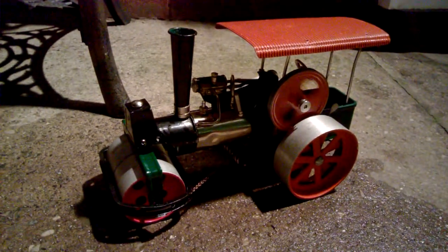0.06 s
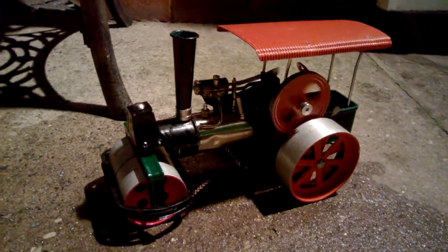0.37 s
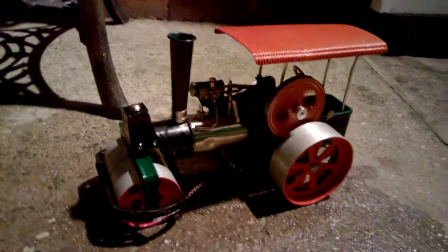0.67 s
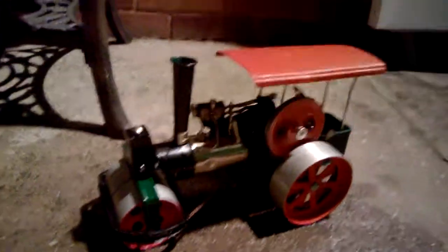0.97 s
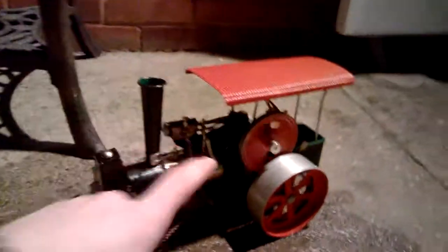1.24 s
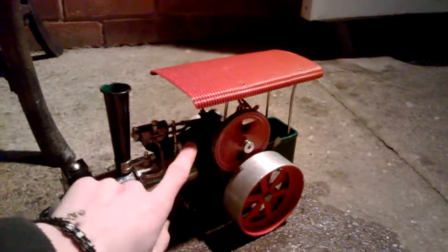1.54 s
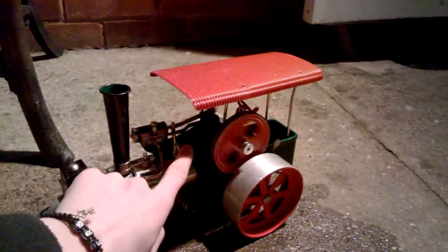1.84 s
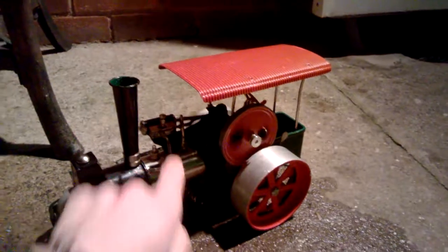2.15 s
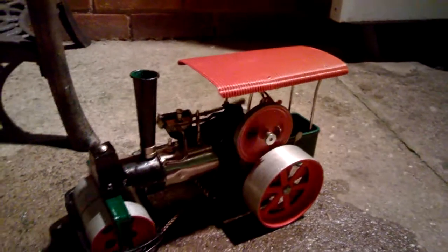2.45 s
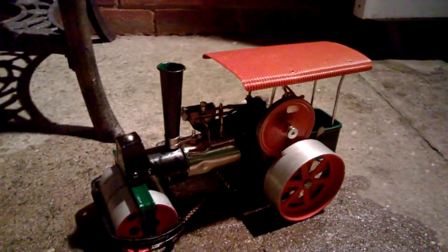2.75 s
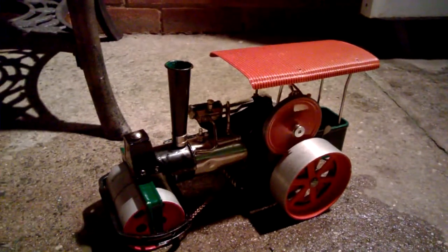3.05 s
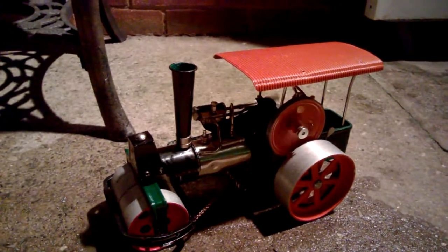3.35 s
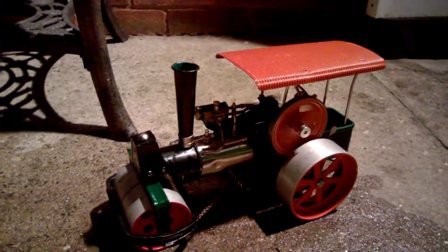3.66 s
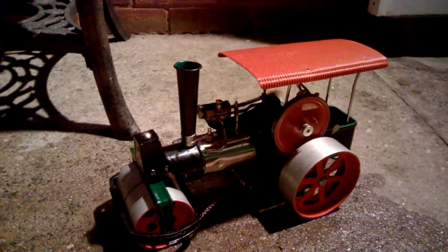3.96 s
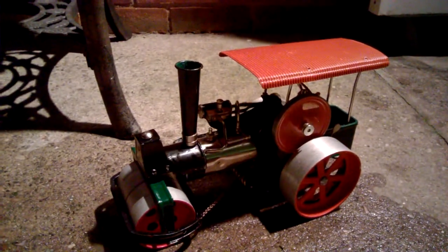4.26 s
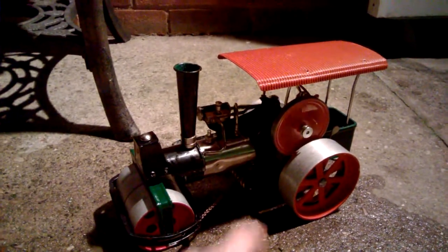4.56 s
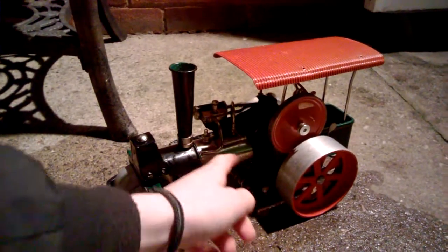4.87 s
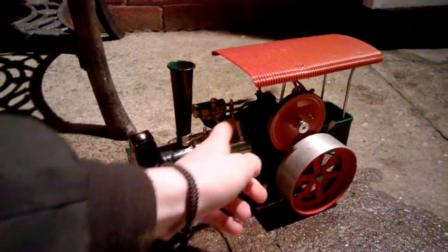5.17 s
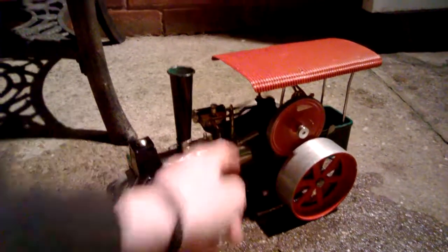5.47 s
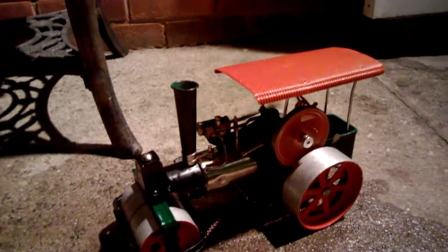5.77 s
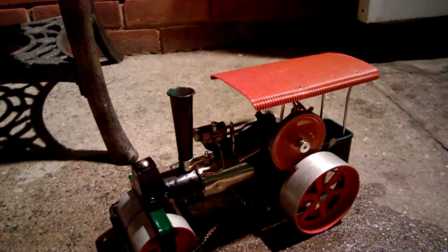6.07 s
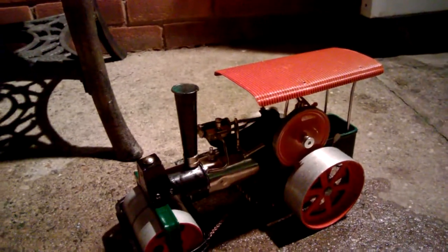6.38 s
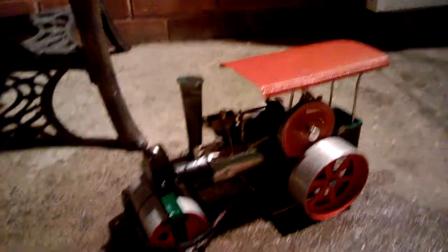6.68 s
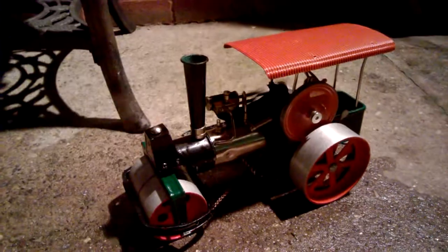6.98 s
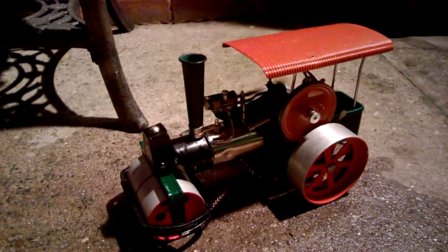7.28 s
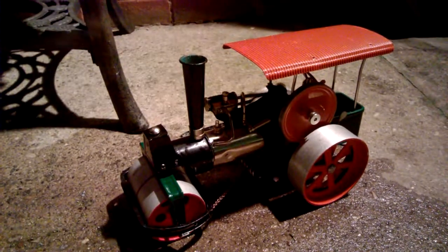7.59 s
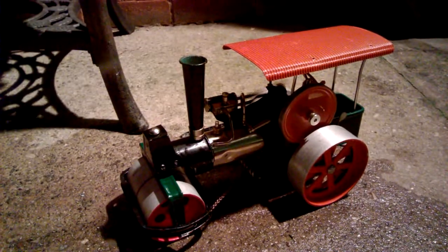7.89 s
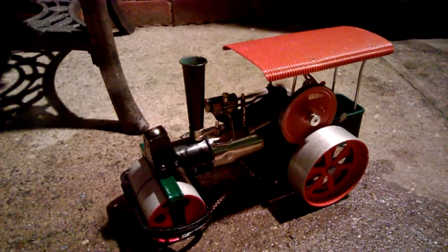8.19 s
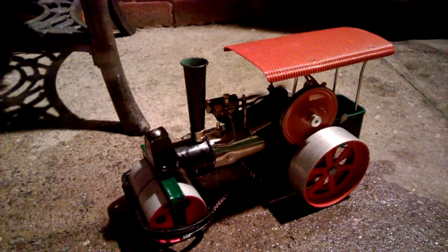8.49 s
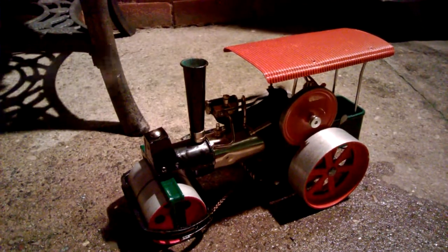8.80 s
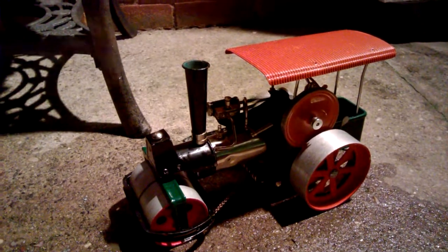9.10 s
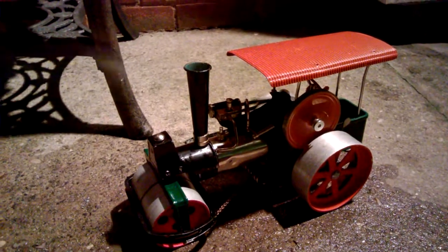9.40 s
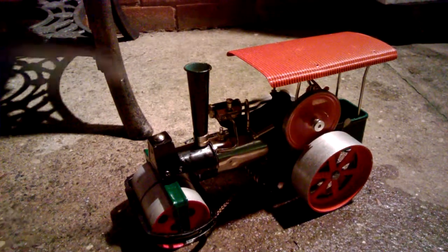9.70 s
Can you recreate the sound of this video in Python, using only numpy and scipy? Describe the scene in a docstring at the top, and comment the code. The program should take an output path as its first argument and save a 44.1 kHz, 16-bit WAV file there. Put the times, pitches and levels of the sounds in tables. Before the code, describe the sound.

A model steam roller runs close to the microphone on a patio, at first ticking faintly about five times a second over a soft burner rush. Wind rumbles and thumps on the microphone, hardest from 0.5 to 1.3 seconds, with weaker gusts until about 3.3. A sleeve swishes past around 1 second. Just after 2 seconds the engine knocks louder, steam hisses, and it begins to speed up steadily, with light linkage clinks from about 3 to 4. From 4 seconds a bright, ringing gear rattle grows, and a few sharper clicks come just after 5. From 6 seconds the rattle is loud, with sharp metal clanks quickening to nearly four a second and scattered rod ticks. Rapid puffing, a thin high ring and a faint rising hum continue to the end, near 10 seconds. A faint low drone wavers in the distance.

```python
"""A model steam roller runs out of gear on a patio at night. Its crank ticks slowly until a finger
opens the steam valve; then it speeds up, and two puffs a turn excite the resonances of the chimney.
Loose gears rattle and ring in their backlash, swelling and clanking once a turn of the big wheel.
Wind buffets the microphone, mostly at first, a sleeve brushes past, and a brick wall answers."""
import sys
import numpy as np
from scipy import signal
from scipy.fft import rfft, irfft, next_fast_len
from scipy.io import wavfile
from scipy.ndimage import map_coordinates

SR = 44100
rng = np.random.default_rng(int(sys.argv[2]) if len(sys.argv) > 2 else 0)


def store_wav(level_fs):
    """Save 16-bit WAV to argv[1]."""
    pcm = np.round(np.clip(np.atleast_2d(level_fs), -1, 1) * 32767)
    wavfile.write(sys.argv[1], SR, pcm.T.astype(np.int16))


N = 438354
TIME = np.arange(N) / SR
FFT_SIZE = 2 * next_fast_len(N // 2 + 8192)

def amp(db):
    """Amplitude grows tenfold for every 20 dB."""
    return 10 ** (np.asarray(db) / 20)

def along(points, hz):
    """Interpolation of (Hz, value) points on a logarithmic frequency axis."""
    freqs, values = np.transpose(points)
    return np.interp(np.log(hz + 1), np.log(freqs + 1), values)

def curves(rows):
    """Linear interpolation in time: one curve for each column after the first."""
    times, *columns = np.transpose(rows)
    return [np.interp(TIME, times, column) for column in columns]

def wobble(knots_per_s):
    """Slow random modulation: a spline through Gaussian knots."""
    return map_coordinates(rng.standard_normal(4096), [np.arange(N) * knots_per_s / SR], mode="wrap")

def white():
    """White noise has equal mean power at all frequencies."""
    return rng.standard_normal(N)

def filtered(x, response):
    """Linear filtering: the spectrum is multiplied by a response scaled to unit power."""
    gain = response(np.fft.rfftfreq(FFT_SIZE, 1 / SR))
    return irfft(rfft(x, FFT_SIZE) * gain / np.sqrt(np.mean(np.abs(gain) ** 2)), FFT_SIZE)[:N]

def coloured(x, spectrum):
    """Minimum-phase filtering imposes a shape of (Hz, dB) points causally."""
    def response(hz):
        cepstrum = irfft(np.log(amp(along(spectrum, hz))))
        cepstrum[1:len(hz) - 1] *= 2
        cepstrum[len(hz):] = 0
        return np.exp(rfft(cepstrum))
    return filtered(x, response)

def rung(x, modes):
    """Modal superposition: x drives damped resonators of alternating polarity."""
    def response(hz):
        return sum((-1) ** k * amp(db) * 1j * hz * width / (centre ** 2 - hz ** 2 + 1j * hz * width)
                   for k, (centre, width, db) in enumerate(modes))
    return filtered(x, response)

def spikes(times, sizes):
    """Ideal impacts: one impulse at each time."""
    return np.bincount(np.maximum(np.round(times * SR), 0).astype(int), sizes, N)[:N]

def bursts(hits, rise, decay):
    """Convolution gives each impulse an envelope of noise; the time constants are in seconds."""
    t = np.arange(SR // 8) / SR
    envelope = (1 - np.exp(-t / rise)) * np.exp(-t / decay)
    return signal.fftconvolve(hits, envelope / envelope.max())[:N] * white()

def strokes(angle, offset, scatter_db, slack=0):
    """Cyclic excitation: one impulse a turn. Angle, offset and random slack are in crank turns."""
    size_spread, time_spread = rng.standard_normal((2, 256))
    turns = np.arange(256) - 1 + offset + slack * time_spread
    times = np.interp(turns, angle, TIME, left=N, right=N)
    heard = times < N
    return spikes(times[heard], amp(scatter_db * size_spread[heard]))

def chatter(angle, count, scatter_db):
    """Clearance lets loose parts make several uneven contacts a turn."""
    return sum(strokes(angle, k / count, scatter_db, slack=0.0898) for k in range(count))

def levelled(x, seconds):
    """Division by a running RMS partly evens out the level."""
    window = signal.windows.hann(int(seconds * SR))
    power = np.abs(signal.fftconvolve(x ** 2, window, "same")) / (seconds * SR / 2)
    return x / np.sqrt(power + 0.36 * np.mean(x ** 2))

# Course of the drone. Each row: time in seconds, level in dB.
DRONE_LEVEL = [(0, -45.5), (3.4, -52.5), (4.6, -54.5), (5.4, -52), (6.5, -57.5), (6.77, -44.5), (7.75, -50),
               (8.0, -45), (8.25, -48), (8.6, -40), (9.25, -45.5), (9.94, -46.5)]
# Its spectrum. Each row: frequency in Hz, gain in dB.
DRONE_SPECTRUM = [(40, -2.5), (110, -8.5), (180, 4.5), (220, -1), (270, -14.5), (600, -17.5), (2000, -33.5),
                  (8000, -56), (12000, -51)]

def drone():
    """Amplitude-modulated low noise is heard as a far, wavering drone."""
    return amp(curves(DRONE_LEVEL)[0] + 2.5 + 2 * wobble(7.1)) * coloured(white(), DRONE_SPECTRUM)

# Passage of the sleeve. Each row: time in seconds, level in dB.
SLEEVE_LEVEL = [(.5, -83), (.63, -50), (.76, -66), (.86, -56.5), (1.06, -46), (1.25, -55), (1.7, -69),
                (2, -91)]
# Spectrum of rubbing cloth. Each row: frequency in Hz, gain in dB.
CLOTH_SPECTRUM = [(400, -59), (1500, -1.5), (4000, 3), (6000, -5.5), (9500, -12.5), (11000, -30),
                  (15000, -32)]

def sleeve():
    """Sliding friction of cloth makes a rough, broadband swish."""
    return amp(curves(SLEEVE_LEVEL)[0] + 2.8 * wobble(60.55)) * coloured(white(), CLOTH_SPECTRUM)

# Gusts of wind. Each row: start in seconds, hold in seconds, strength in dB.
WIND_GUSTS = [(0.016, 0.11, -21), (0.241, 0.038, -26), (0.413, 0.071, -23), (0.516, 0.0069, -14),
              (0.558, 0.045, -17), (0.622, 0.073, -12.5), (0.74, 0.073, -18.5), (0.87, 0.012, -14),
              (0.944, 0.043, -18), (1.009, 0.07, -14.5), (1.113, 0.085, -15.5), (1.253, 0.047, -13.5),
              (1.511, 0.042, -23), (1.811, 0.024, -22), (1.928, 0.043, -22.5), (2.04, 0.028, -22.5),
              (2.155, 0.29, -39.5), (2.989, 0.033, -26), (3.114, 0.02, -31.5), (3.228, 0.059, -28),
              (4.63, 0.27, -42.5), (6.256, 0.029, -34.5), (9.56, 0.27, -40)]

def gustiness():
    """Gusts rise and decay exponentially over a light breeze; the result is in dB re a full gust."""
    attack_s, release_s, full_gust_db = 0.02, 0.035, -15
    strength = amp(-51 - wobble(7))  # the breeze
    for start, hold, db in WIND_GUSTS:
        before = np.maximum(start - TIME, 0) / attack_s
        after = np.maximum(TIME - start - hold, 0) / release_s
        strength = np.maximum(strength, amp(db) * np.exp(-before - after))
    eddies_db = 1.3 * wobble(30)
    return 20 * np.log10(strength) - full_gust_db + eddies_db

# Two spectra of wind noise. Each row: frequency in Hz, gain in dB.
RUMBLE_SPECTRUM = [(15, -4.5), (30, 0), (75, 0.5), (150, -2.5), (240, -12.5), (400, -38), (1000, -76),
                   (3000, -84)]
FLUTTER_SPECTRUM = [(60, -22), (150, 0), (280, 5), (480, -5.5), (700, -18), (950, -23.5), (1400, -37),
                    (4000, -53), (15000, -81)]

def wind():
    """Turbulent pressure on the microphone: light air murmurs, stronger gusts rumble, then flutter."""
    gust_db = gustiness()
    rumble = levelled(coloured(white(), RUMBLE_SPECTRUM), seconds=0.11)
    flutter = levelled(coloured(white(), FLUTTER_SPECTRUM) * amp(4.5 * wobble(70)), seconds=0.1)
    murmur = coloured(white(), [(15, -32.5), (30, 3.5), (70, 2.5), (110, -22), (250, -23),
                                (1000, -51.5), (15000, -110)])
    return (amp(-27 + 0.63 * gust_db) * murmur + amp(-17 + 1.28 * gust_db) * rumble
            + amp(-21.5 + 2.35 * gust_db) * flutter)

# The hardest eddies. Each row: start in seconds, level in dB.
EDDY_HITS = [(0.512, -17), (0.604, -12), (0.646, -12), (0.699, -15), (0.723, -9.5), (0.881, -11),
             (0.958, -24), (1.058, -9), (1.125, -9.5), (1.282, -17.5)]
# Their spectrum. Each row: frequency in Hz, gain in dB.
THUMP_SPECTRUM = [(80, -5), (300, -3), (520, -7), (900, -22.5), (1500, -36.5), (5000, -66), (15000, -85)]

def buffets():
    """The pressure pulse of a single eddy thumps the microphone."""
    times, db = np.transpose(EDDY_HITS)
    return amp(-2.5) * coloured(bursts(spikes(times, amp(db)), rise=0.0014, decay=0.0047), THUMP_SPECTRUM)

# Reverberation of the patio. Each row: frequency in Hz, time to decay by 60 dB in seconds.
PATIO_DECAY = [(200, 0.2), (2000, 0.087), (10000, 0.15)]

def patio(x):
    """Reflections from paving and wall form a short, exponentially decaying tail after 4 ms."""
    hz, t, noise = signal.stft(rng.standard_normal(SR // 3), SR, nperseg=256)
    decay = amp(-60 * t / along(PATIO_DECAY, hz)[:, None])
    tail = signal.istft(noise * decay, SR, nperseg=256)[1]
    return signal.fftconvolve(x, np.pad(tail, (SR // 250, 0)) / np.linalg.norm(tail))[:N]

# Rush of the flame. Each row: time in seconds, level in dB.
FLAME_LEVEL = [(0, -45), (.25, -46.5), (.4, -51), (.9, -53.5), (1.3, -52), (1.5, -43.5), (1.7, -51),
               (2, -56.5), (3, -51), (9.94, -57)]

def burner():
    """Unsteady combustion makes a soft rush under the boiler."""
    flame = coloured(white(), [(300, -8), (850, 4.5), (1800, 2), (2400, -8), (5000, -19.5), (15000, -56)])
    return amp(curves(FLAME_LEVEL)[0] + 2.3 * wobble(25)) * flame

# Response of the boiler shell and canopy. Each row: frequency in Hz, gain in dB.
SHELL_RESPONSE = [(250, -16), (350, -8), (415, 0), (455, -4), (500, 0), (570, -1), (640, -2), (700, -11),
                  (800, -7), (865, -7), (905, 0), (955, 1), (1000, -7), (1090, -6), (1200, -16)]
# Uneven harmonics of the hum. Each row: multiple of the crank speed, extra gain in dB.
HUM_HARMONICS = [(15, 1), (16, -2), (17, 8), (18, -4), (20, -3), (21, 2), (22, 1), (23, 2), (24, -2),
                 (25, 1), (26, 1)]

def shell_hum(angle, speed):
    """Forced vibration: harmonics of the crank climb through the shell's resonances as it speeds up."""
    orders, extra_db = np.arange(12, 62), dict(HUM_HARMONICS)
    hum = np.zeros(N)
    for order, phase in zip(orders, rng.random(len(orders))):
        gain = amp(along(SHELL_RESPONSE, order * speed) + extra_db.get(order, 0))
        hum += gain * np.sin(2 * np.pi * (order * angle + phase))
    growth = (speed / speed.max()) ** 2.3
    return amp(curves(STEAM_FLOW)[0] - 4) * growth * hum / np.std(hum[-SR:])

# Leak at the piston rod once the valve is open. Each row: time in seconds, level in dB.
GLAND_LEVEL = [(2.06, -77), (2.1, -56), (2.4, -52), (3.4, -48), (4.2, -50), (5.5, -72)]
# Its spectrum. Each row: frequency in Hz, gain in dB.
GLAND_SPECTRUM = [(500, -23), (1500, 11), (4200, 9), (5200, -6), (5500, -9), (5900, -2), (6200, -1.5),
                  (6900, -11), (7500, -2), (9000, -17), (11000, -34), (12000, -35), (15500, -34)]

def gland():
    """Jet noise: live steam hisses out around the piston rod, a little unsteadily."""
    return amp(curves(GLAND_LEVEL)[0] + 0.5 * wobble(29.5)) * coloured(white(), GLAND_SPECTRUM)

# Ringing of the flywheel rim. Each row: time in seconds, level in dB.
RIM_LEVEL = [(0, -78), (1.1, -73), (1.5, -59), (2.4, -60), (3.5, -54), (5, -49.5), (6.5, -43), (9.94, -42)]
# Its modes. Each row: frequency in Hz, bandwidth in Hz, gain in dB.
FLYWHEEL_MODES = [(5125, 60, -7), (5205, 38, 0)]

def flywheel(angle):
    """Repeated jolts excite two close modes of the rim, which rings thinly and unevenly."""
    jolts = bursts(chatter(angle, count=4, scatter_db=3), rise=.0005, decay=.004)
    tone = coloured(rung(jolts, FLYWHEEL_MODES), [(3000, -20), (5200, 0), (7000, -25)])
    return amp(curves(RIM_LEVEL)[0] + 2 * wobble(11)) * levelled(tone, seconds=.2)

# Contacts in the valve linkage. Each row: start in seconds, level in dB.
LINKAGE_HITS = [(2.803, -24.5), (3.075, -26), (3.252, -27), (3.31, -31), (3.4214, -25.5), (3.675, -27),
                (3.7264, -25), (3.8222, -29), (4.173, -28)]
# Its modes. Each row: frequency in Hz, bandwidth in Hz, gain in dB.
LINKAGE_MODES = [(531, 20, -8.5), (1490, 59, 8.5), (1605, 62, 2.5)]

def linkage_clinks():
    """Free vibration follows each contact of the slack linkage while the engine gathers speed."""
    times, db = np.transpose(LINKAGE_HITS)
    ring = rung(spikes(times, amp(db)), LINKAGE_MODES)
    return amp(16) * coloured(ring, [(400, 9), (1600, -3.5), (3000, 1.5), (12000, -29)])

# Response of the frame. Each row: frequency in Hz, gain in dB.
FRAME_RESPONSE = [(250, -34.5), (500, -17.5), (1300, -9), (1700, -1), (3200, -3), (3800, -2.5), (4700, 4),
                  (5250, -3), (5550, -9.5), (6200, -8.5), (7000, -14), (8500, 1), (9800, -19.5),
                  (12500, -28), (15500, -33.5)]

def frame_clatter(hits, rise, decay):
    """Impacts on the frame die quickly and give a broadband clatter."""
    return coloured(bursts(hits, rise, decay), FRAME_RESPONSE)

# Modes of the rods and boiler fittings. Each row: frequency in Hz, bandwidth in Hz, gain in dB.
ROD_MODES = [(935, 40, 0), (1595, 70, -1), (1819, 60, -3), (2190, 70, 0), (2598, 60, 1), (2867, 60, -2)]
FITTING_MODES = [(4150, 200, -8), (4450, 160, -6), (4660, 130, -2), (4830, 130, -1), (5040, 150, -3)]

def rod_ring(hits):
    """Short, hard contacts excite the modes of rods and fittings together."""
    ring = rung(hits, ROD_MODES + FITTING_MODES)
    return coloured(ring, [(500, -20), (900, -2), (3500, -1), (4600, 4), (5150, 3),
                           (5600, -14), (12000, -30)])

# Hard contacts of the rods. Each row: start in seconds, level in dB.
ROD_HITS = [(6.389, -23), (6.41, -26), (6.629, -24), (6.971, -30), (7.056, -25.5), (7.15, -23.5),
            (7.225, -19.5), (7.344, -29), (7.36, -22), (7.426, -24.5), (7.442, -25), (7.509, -28),
            (7.532, -25), (8.623, -28), (8.765, -20), (8.936, -24), (9.087, -28), (9.182, -19),
            (9.229, -23), (9.349, -21), (9.389, -29), (9.453, -17), (9.659, -27)]

def rod_ticks():
    """The impact of a rod on its pin rings rods and fittings and jars the frame."""
    times, db = np.transpose(ROD_HITS)
    hits = spikes(times, amp(db))
    clatter = frame_clatter(hits, rise=.0003, decay=.003)
    return amp(12) * rod_ring(hits) + amp(9) * rung(hits, FITTING_MODES) + amp(-12) * clatter

# Load on the slack crank bearing. Each row: time in seconds, knock level in dB.
BEARING_LOAD = [(0, -33.5), (1.35, -27), (1.55, -35), (2.0, -42), (2.14, -21.5), (2.39, -16.5),
                (2.56, -17.5), (2.75, -19), (3.55, -21.5), (4, -29), (9.94, -22.5)]
# Single knocks and clicks of the crank bearing, valve lever and a finger.
# Each row: start in seconds, level in dB, relative treble in dB.
STRAY_KNOCKS = [(0.215, -41, -13), (0.422, -35.5, -20), (0.918, -47, -31), (0.959, -33.5, -24),
                (1.5883, -46, -46), (1.7267, -28, -19), (1.786, -43, -25), (2.083, -21, -11),
                (5.027, -23.5, -17), (5.245, -19.5, -13), (5.2752, -17.5, -10)]
# Spectra of a knock's body and bright crack. Each row: frequency in Hz, gain in dB.
KNOCK_SPECTRUM = [(200, -10.5), (600, -14.5), (950, 1.5), (1400, -0.5), (2300, 2), (2700, 2), (3150, 3),
                  (3650, -1), (5000, -8.5), (7000, -36), (12000, -54)]
CRACK_SPECTRUM = [(3000, 1), (6000, 1.5), (8500, -4), (9800, -17), (10600, -7.5), (11100, -23),
                  (12500, -27), (14900, -31), (15450, -22), (15900, -34)]

def knocks(angle):
    """Load reversal knocks the bearing at both dead centres, amid slide valve ticks and stray knocks."""
    load = amp(curves(BEARING_LOAD)[0])
    outward = load * strokes(angle, offset=.03, scatter_db=0.6)
    back = load * amp(-8.5) * strokes(angle, offset=.565, scatter_db=1.2)
    valve = load * strokes(angle, offset=.36, scatter_db=1.2)
    times, db, treble_db = np.transpose(STRAY_KNOCKS)
    blows = outward + back + amp(-14.5) * valve + spikes(times, amp(db))
    edges = amp(-19.5) * outward + amp(-20) * back + amp(-25.5) * valve
    edges += spikes(times, amp(db + treble_db))
    body = coloured(bursts(blows, rise=.003, decay=.0035), KNOCK_SPECTRUM)
    crack = coloured(bursts(edges, rise=.002, decay=.007), CRACK_SPECTRUM)
    return amp(-6.5) * body + amp(-0.5) * crack

# Spectrum of a tooth contact. Each row: frequency in Hz, gain in dB.
CONTACT_SPECTRUM = [(1000, -4), (6000, 8), (8200, -0.5), (9500, -1), (12000, -11.5), (15500, -20)]
# Modes of the steel gears. Each row: frequency in Hz, bandwidth in Hz, gain in dB.
GEAR_MODES = [(7878, 30, -9), (8292, 75, 0), (8440, 100, -3), (10900, 35, -13), (12302, 45, -3.5),
              (14330, 55, -14)]

def gear_ring(hits):
    """Brief metal contacts are broadband enough to excite the high modes of the gears."""
    return rung(coloured(hits, CONTACT_SPECTRUM), GEAR_MODES)

# Single teeth that stand out of the rattle. Each row: start in seconds, level in dB.
TOOTH_HITS = [(0.325, -45), (1.87, -49), (1.972, -44), (2.909, -37), (3.124, -36), (3.475, -28),
              (3.58, -32), (3.692, -31), (3.838, -28), (4.198, -30), (4.668, -26), (4.778, -23),
              (5.119, -26), (5.161, -24), (5.206, -25), (5.683, -27), (5.794, -24)]

def tooth_strikes():
    """The impact of one tooth sets the gears in free vibration, duller than in a clank."""
    times, db = np.transpose(TOOTH_HITS)
    ring = gear_ring(bursts(spikes(times, amp(db)), rise=.0002, decay=.003))
    return amp(-1) * coloured(ring, [(9500, 0), (11500, -9)])

# Metal clanks, most once a turn of the big wheel, and one duller knock of a finger. Each row:
# start in seconds, level in dB, relative level of the body in dB, level of the lead-in touch in dB.
CLANK_HITS = [(4.272, -20, -4, -30), (4.7397, -21, -13, -35), (5.2745, -30, 12.5, -34),
              (6.075, -11.5, -9, -23.5), (6.44, -8.5, -14, -31), (6.7846, -8, -15, -48),
              (7.11, -11, -15, -25), (7.69, -19.5, -1, -41), (8.024, -7.5, -21.5, -19.5),
              (8.315, -13, -13, -28), (8.5967, -6, -13, -21.5), (8.874, -11, -11, -17.5),
              (9.146, -3, -15.5, -17.5), (9.42, -8, -13, -22.5), (9.687, -10.5, -8, -23)]

def clanks():
    """Impacts, mostly from gear backlash, ring gears, frame and fittings; a lighter touch leads each."""
    times, db, body_db, lead_db = np.transpose(CLANK_HITS)
    crank_period = 1 / np.interp(times, *np.transpose(CRANK_SPEED))
    lead = spikes(times - crank_period, amp(lead_db))
    ring = gear_ring(bursts(spikes(times, amp(db)) + amp(-6) * lead, rise=0.000098, decay=0.0051))
    shock = spikes(times, amp(db + body_db)) + lead
    body = frame_clatter(shock, rise=0.0003, decay=0.014)
    fittings = rung(bursts(shock, rise=.001, decay=.005), FITTING_MODES)
    return amp(-5.5) * ring + amp(-4.5) * body + amp(-9) * fittings

def brightened(x, db):
    """Harder contacts put a larger share of their energy above 10 kHz."""
    treble = signal.sosfiltfilt(signal.butter(8, 10000, "high", fs=SR, output="sos"), x)
    return x - treble + treble * amp(2 + 0.71 * (db - np.percentile(db, 90)))

# Rattle of the loose gears. Each row: time in seconds, ringing in dB, clatter in dB,
# hush of the ringing at the tightest mesh in dB (a negative hush is a boost).
RATTLE_LEVELS = [(0, -69, -59.5, -17), (0.9, -81, -78, -3), (1.5, -59, -51, 0), (2.05, -75, -60, -1),
                 (2.4, -54, -56, -2), (3.0, -43.5, -47, 3), (3.7, -42, -40.5, 11.5),
                 (4.3, -31.5, -38.5, 19.5), (5.2, -30, -37, 9.5), (5.43, -39, -35, 10), (5.7, -31, -39, 6),
                 (6.1, -24.5, -37.5, 1.5), (7, -26, -33.5, 0.5), (8.0, -23, -31.5, 3.5),
                 (9.3, -24, -31.5, -0.5), (9.94, -24.5, -30.5, 7.5)]
GEAR_RATIO, MESH_AT = 6.575, .83  # crank turns per wheel turn; tightest mesh, in wheel turns

def gear_levels(angle):
    """Amplitude modulation: ringing and clatter, in dB, swing with the wheel's mesh and by chance."""
    ring_db, clatter_db, hush_db = curves(RATTLE_LEVELS)
    tightness = (.5 + .5 * np.cos(2 * np.pi * (angle / GEAR_RATIO - MESH_AT))) ** 2
    chance = wobble(26)
    return ring_db - hush_db * tightness + 2 * chance, clatter_db - 0.7 * hush_db * tightness + chance

def gear_rattle(angle):
    """Teeth and rods chatter in their clearances, hardest at each piston thrust, and shake the frame."""
    ring_db, clatter_db = gear_levels(angle)
    thrust = amp(2 * np.cos(4 * np.pi * (angle - PUFF_AT)))
    teeth = thrust * chatter(angle, count=8, scatter_db=3.5)
    rods = thrust * chatter(angle, count=4, scatter_db=4)
    ring = levelled(gear_ring(bursts(teeth, rise=0.00018, decay=0.0022)), seconds=0.18)
    clatter = levelled(frame_clatter(teeth + rods, rise=0.0004, decay=0.0028), seconds=0.18)
    pings = levelled(rod_ring(rods), seconds=0.15)
    return (amp(ring_db - 8) * brightened(ring, ring_db)
            + amp(clatter_db - 1.5) * brightened(clatter, clatter_db) + amp(clatter_db - 4) * pings)

# Flow of steam. Each row: time in seconds, level in dB.
STEAM_FLOW = [(0, -64), (1.55, -50.5), (1.96, -53), (2.63, -50.5), (3.68, -43.5), (4.5, -43), (6.1, -38.5),
              (8.6, -37.5), (9.94, -37)]
# Spectra of a puff and of the steady leak. Each row: frequency in Hz, gain in dB.
PUFF_SPECTRUM = [(250, 4.5), (500, 4.5), (2800, -4), (4500, 16.5), (6000, -29), (10500, -32), (12000, -45),
                 (15500, -59)]
LEAK_SPECTRUM = [(100, -4), (350, -12.5), (700, -6.5), (900, -7.5), (1350, 0), (1700, 2), (3000, 2),
                 (5100, -16.5), (5700, -10), (8500, -23.5), (11000, -26), (15500, -48)]
# Resonances of chimney and boiler. Each row: frequency in Hz, bandwidth in Hz, gain in dB.
CHIMNEY_MODES = [(545, 34, -19), (640, 41, -17), (914.4, 48, 1.5), (1135, 66, -0.5), (1582, 112, 2.5),
                 (1890, 170, -3), (2198, 51, 1.5), (2545, 67, 7), (2920, 264, -1)]
PUFF_AT, RETURN_PUFF_AT = .72, .2  # the exhaust openings, in crank turns

def exhaust(angle):
    """Source and filter: two jets of steam a turn excite the chimney's resonances, over a steady leak."""
    puffs = strokes(angle, PUFF_AT, scatter_db=2, slack=.004)
    puffs += amp(-3) * strokes(angle, RETURN_PUFF_AT, scatter_db=2, slack=.004)
    jets = coloured(bursts(puffs, rise=0.0016, decay=0.006), PUFF_SPECTRUM)
    rush = levelled(rung(jets, CHIMNEY_MODES), seconds=0.18)
    leak = amp(-6.5) * coloured(white(), LEAK_SPECTRUM) * amp(2 * wobble(25))
    return amp(curves(STEAM_FLOW)[0]) * (rush + leak)

# Rotation of the crankshaft. Each row: time in seconds, speed in turns per second.
CRANK_SPEED = [(0, 4.85), (1.6, 4.85), (2, 4.6), (2.27, 4.7), (2.64, 6.14), (3, 7.62), (3.5, 9.5),
               (4, 11.3), (4.5, 13), (5, 14.12), (5.5, 15.17), (6, 17.14), (6.5, 18.8), (7, 20.15),
               (7.5, 21.65), (8.5, 23.31), (9, 24), (9.94, 24.78)]

def scene():
    """Superposition: the engine, its reflections and the background add in one channel."""
    speed, = curves(CRANK_SPEED)
    angle = np.cumsum(speed) / SR + .58  # in turns
    engine = (exhaust(angle) + gland() + flywheel(angle) + gear_rattle(angle) + tooth_strikes()
              + knocks(angle) + rod_ticks() + linkage_clinks() + clanks())
    roller = engine + amp(-8) * patio(engine) + shell_hum(angle, speed) + burner()
    return (roller + wind() + buffets() + drone() + sleeve())[None]

def record(dry):
    """Soft saturation rounds the hardest peaks, and a low-pass filter limits the band."""
    ceiling, top_hz = .58, 15900
    rounded = dry / (1 + np.abs(dry / ceiling) ** 6) ** (1 / 6)
    passband = np.fft.rfftfreq(FFT_SIZE, 1 / SR) < top_hz
    return irfft(rfft(rounded, FFT_SIZE) * passband, FFT_SIZE)[:, :N]

dry = scene()
out = record(dry)
store_wav(out)
```